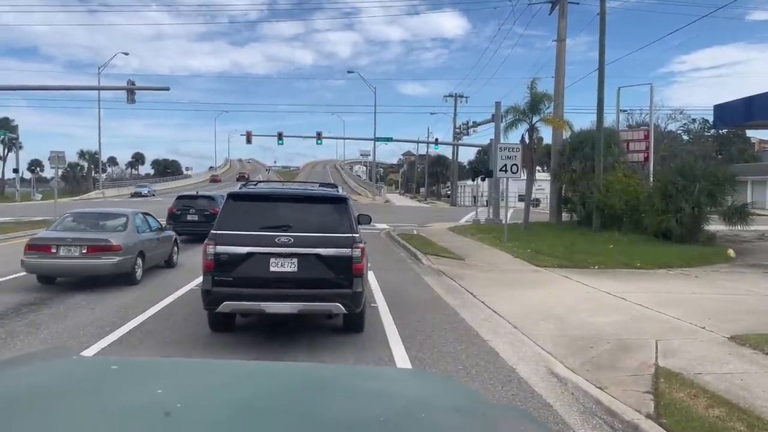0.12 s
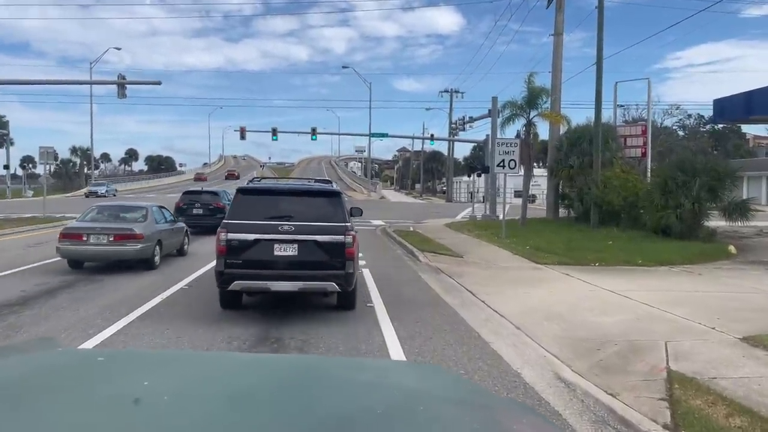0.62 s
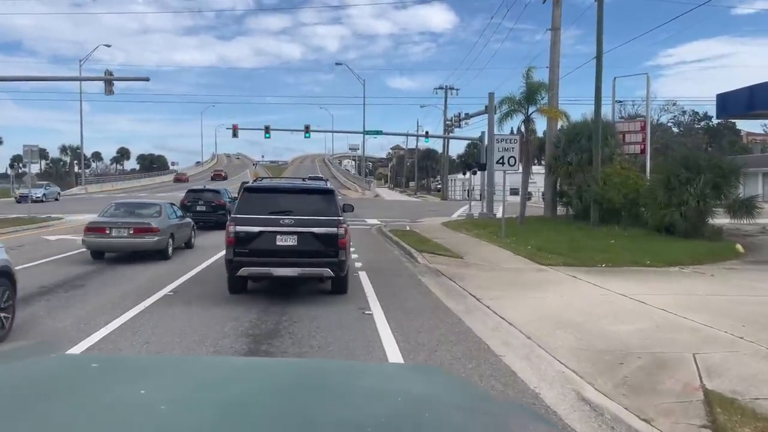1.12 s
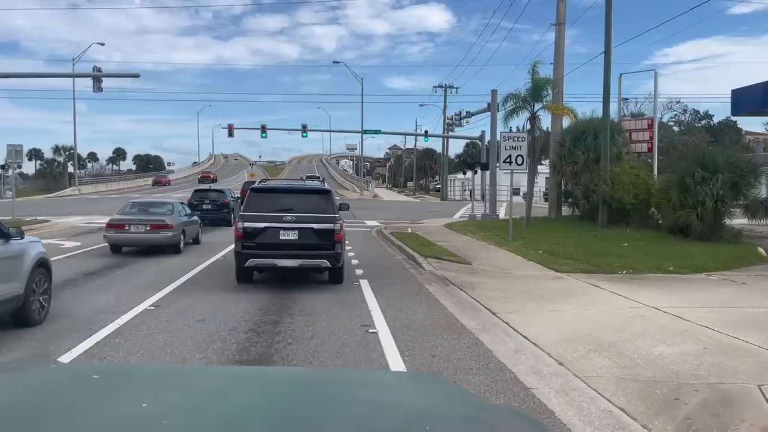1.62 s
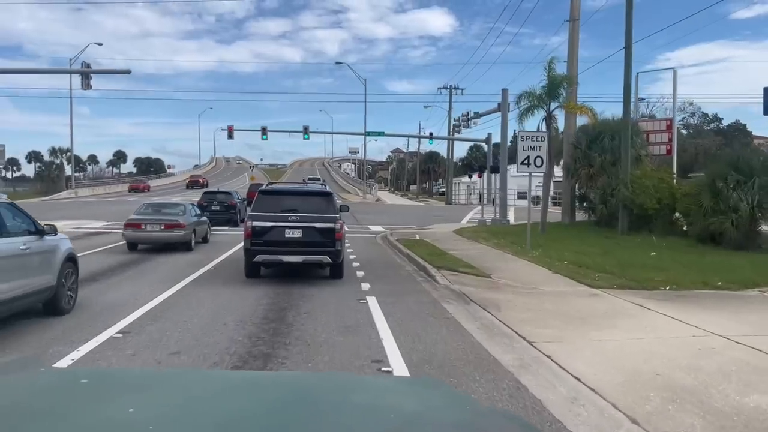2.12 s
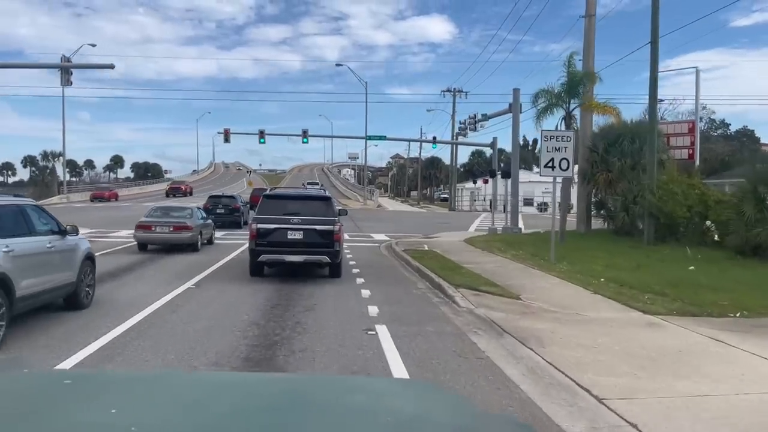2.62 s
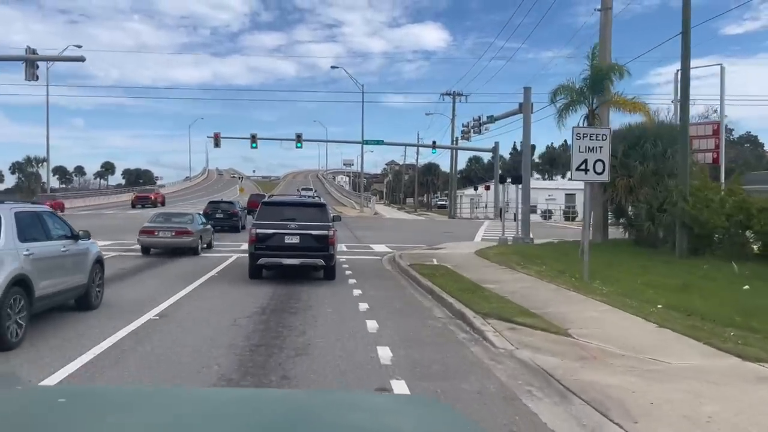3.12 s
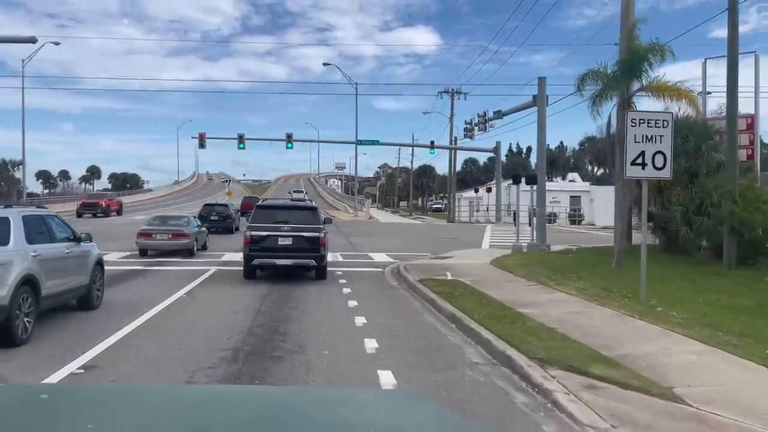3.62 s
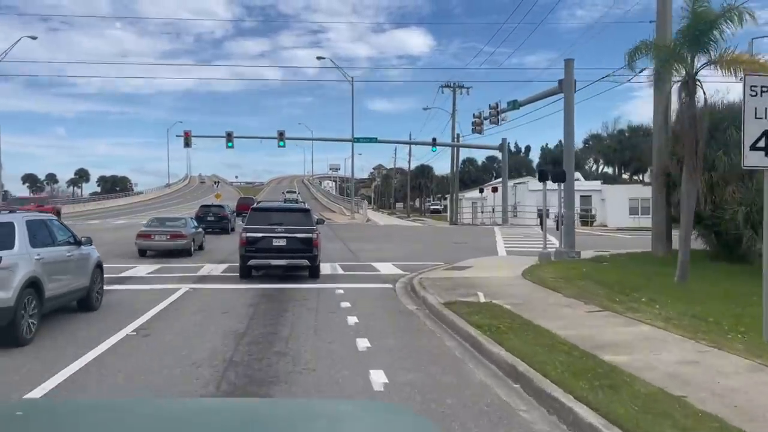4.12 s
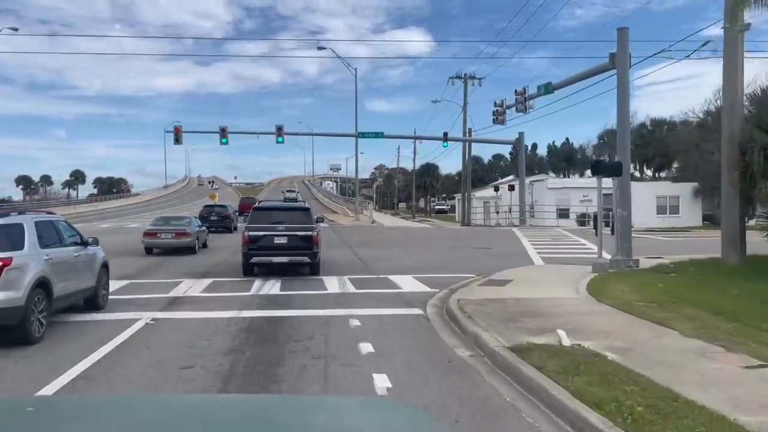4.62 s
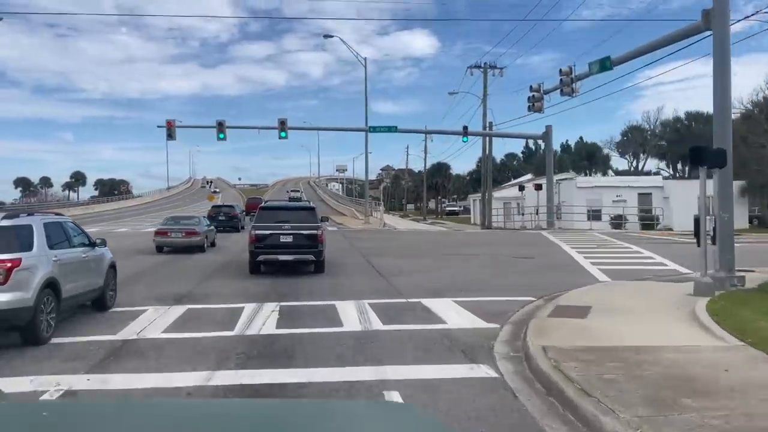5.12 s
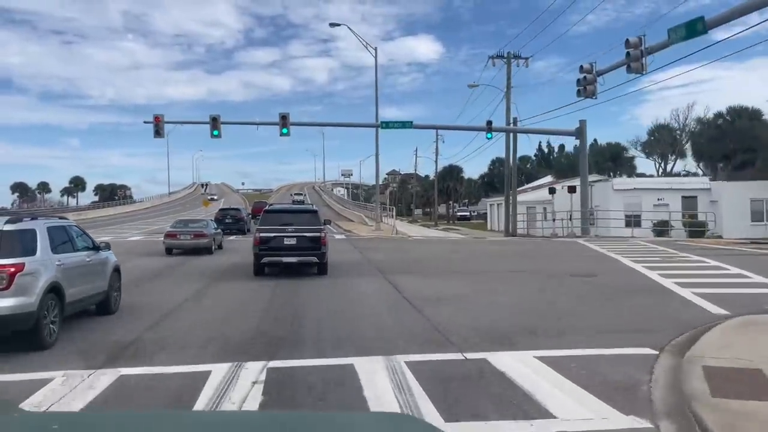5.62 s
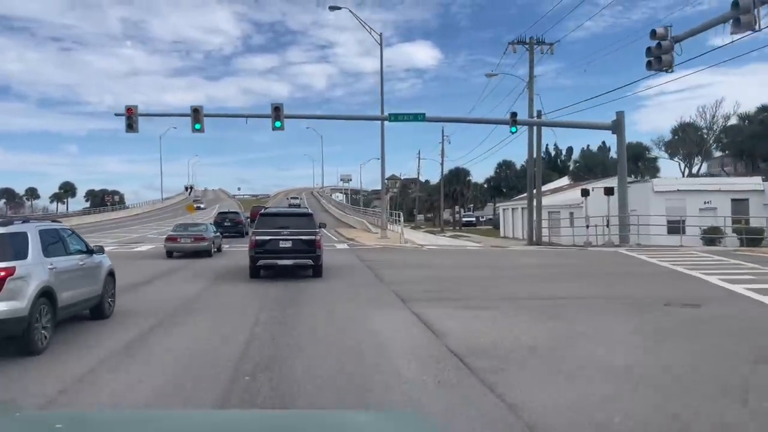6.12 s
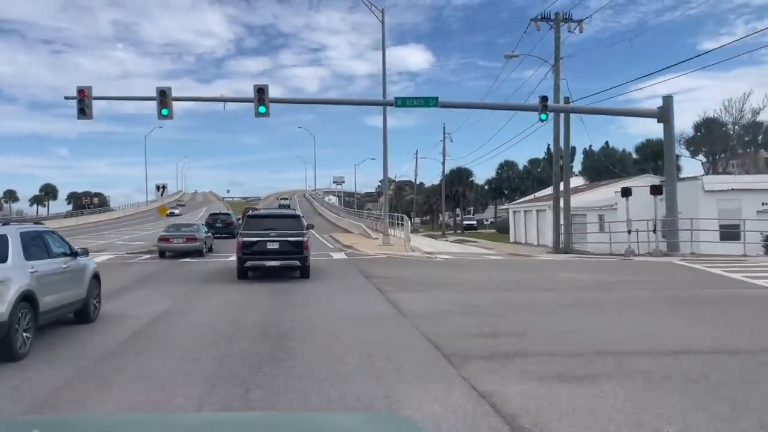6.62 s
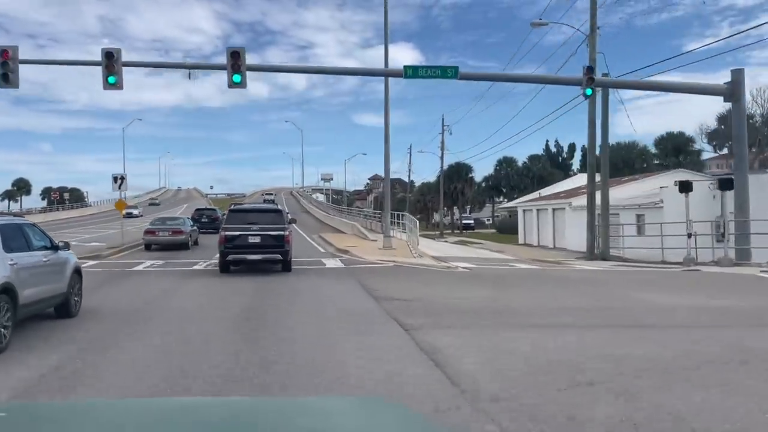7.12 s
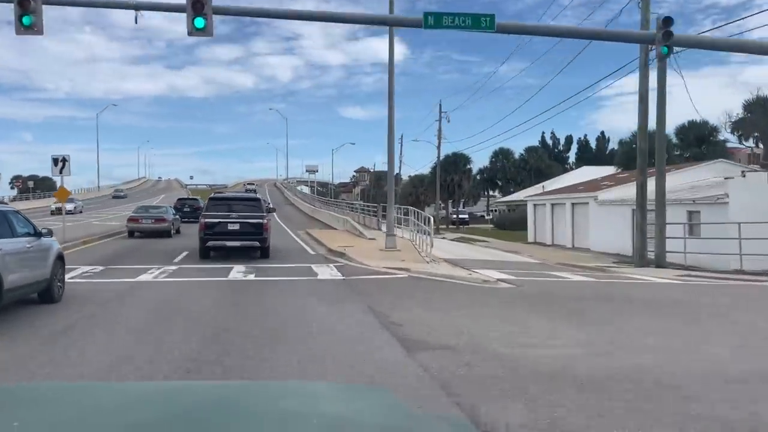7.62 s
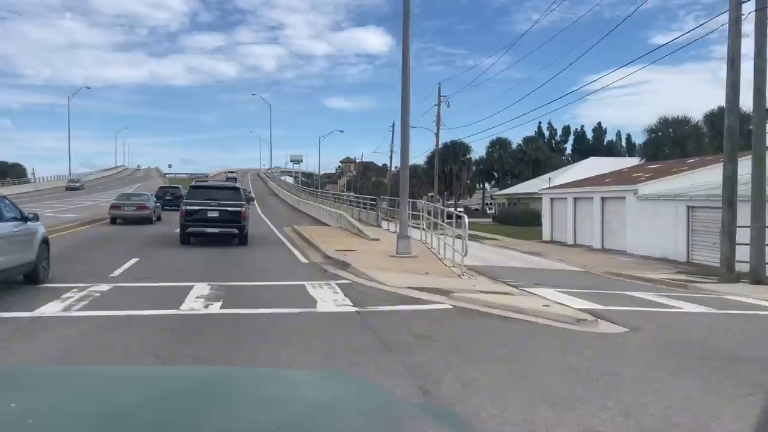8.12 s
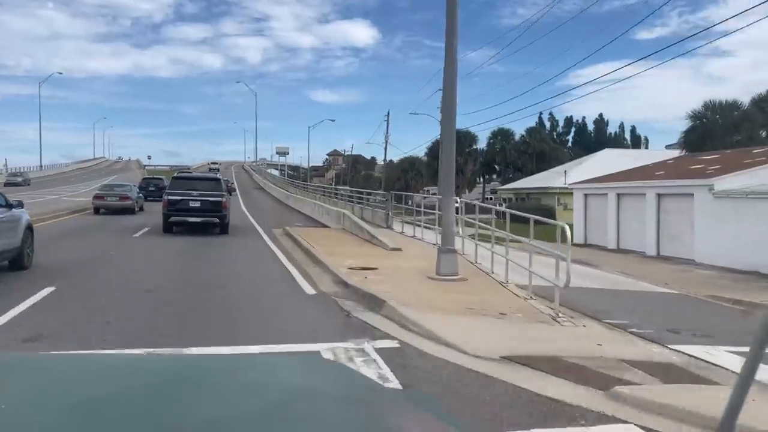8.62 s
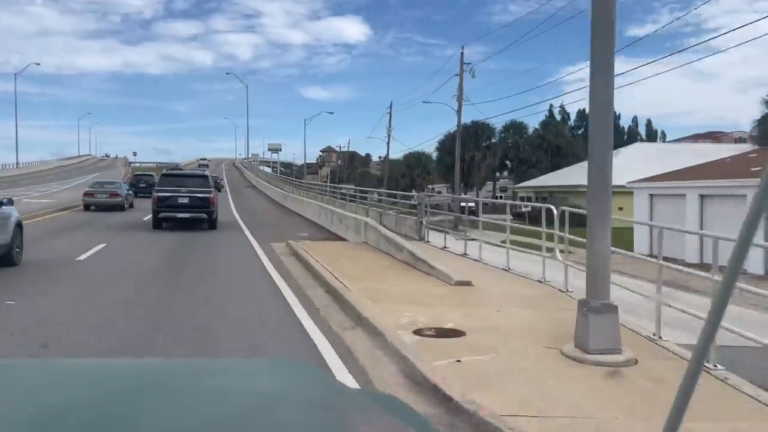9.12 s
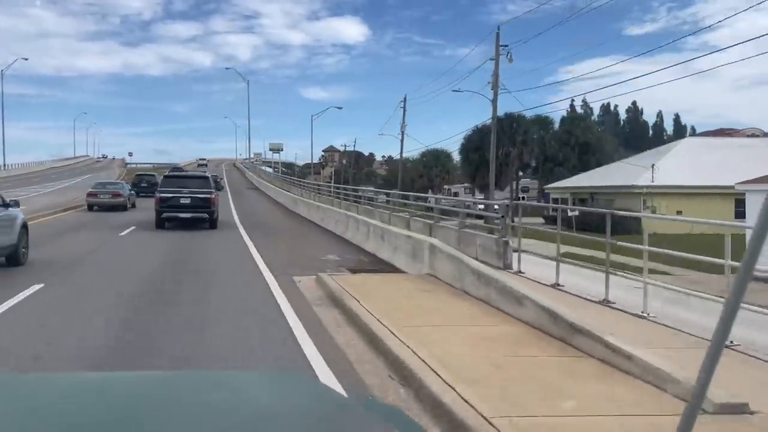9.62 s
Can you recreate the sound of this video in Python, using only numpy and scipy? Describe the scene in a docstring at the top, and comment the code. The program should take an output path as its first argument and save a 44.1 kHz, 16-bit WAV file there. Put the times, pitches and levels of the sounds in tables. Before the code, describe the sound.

Inside an old truck's small, boxy cab, the microphone hears a six-cylinder turbo diesel, dense and bass-heavy with slightly squeezed peaks. From 0 to 2 seconds it lugs near idle, uneven and knocking, with heavy thumps around 0.2 to 1.2 and dry trim ticks; the revs dip slightly near 2. From 2.2 it pulls hard, pitch climbing continuously to about triple by 6.5, the separate knocks merging into a booming drone with metallic clatter, dash rattles around 3 to 4.3, a faint rising turbo whistle and fuzzy gear whine. At 6.7 load comes off and the pitch falls quickly to a low at 7.4. A short blip peaks near 7.75 with panel shudder and rattling, then the engine settles by 8 and pulls again, rising gently until 9.8. Road rumble and soft, fluttering air hiss continue underneath.

```python
"""Inside an old truck cab, a six-cylinder turbo diesel creeps off near idle, pulls up through a gear,
drops off load for a gear change with a throttle blip, and pulls again. Sines locked to the firing rate
make the exhaust boom; uneven impulse trains ring the frame, panels, cab air and firewall. Shaped noise
makes clatter, rasp, rumble and hiss, wavering sines the turbo and gears, short bursts the thumps and taps."""
import sys
import numpy as np
from scipy import signal
from scipy.fft import rfft, irfft, next_fast_len
from scipy.io import wavfile
from scipy.ndimage import uniform_filter1d, map_coordinates

SR = 44100
rng = np.random.default_rng(int(sys.argv[2]) if len(sys.argv) > 2 else 0)


def generate_wav(signal):
    """Clip the signal to [-1, 1] and save it as 16-bit WAV at the path in sys.argv[1]."""
    frames = np.transpose(np.atleast_2d(signal))
    scaled = np.clip(frames, -1, 1) * 32767
    pcm = np.round(scaled).astype(np.int16)
    wavfile.write(sys.argv[1], SR, pcm)


def amplitude_ratio(level_db):
    """Convert a level in decibels to the matching linear amplitude (field) ratio."""
    exponent = np.asarray(level_db, float) / 20
    return 10 ** exponent


N = 430416

# the six cylinders in firing order: frame shake, knock at low revs, its lag/ms,
# knock at high revs, its lag/ms
CYLINDER_BLOWS = [(1.35, .4, -.47, .3, -.57), (-.9, .75, 1.01, .2, .79), (-.2, .3, .7, .65, 1.3),
                  (.45, .7, -.1, .4, -.54), (0, .45, 1.11, .25, .75), (-.9, 1, 0, 1, 0)]
# floor and door panels, passed twice: f/Hz, width/Hz, relative level per pass/dB
FRAME_MODES = [(54.6, 11.4, 2.5), (106.2, 11.6, -1.5), (116.4, 9.4, -0.5), (173, 23.5, -3.5),
               (183, 11.4, 1), (224.3, 75.5, -6.5)]
# firewall and dash, passed twice: f/Hz, width/Hz, relative level per pass/dB
FIREWALL_MODES = [(500, 72, 3.5), (602.7, 33.4, 3), (649, 30.3, 4), (742.4, 42, 2.5), (813.6, 42, 2),
                  (1190, 120, -5.5)]
KNOCK_AFTER = 0.5  # aim of a knock in the cab air, as a share of the gap between firings


def unit(x):
    """Normalisation: scale to rms 1."""
    return x / np.sqrt(np.mean(x ** 2) + 1e-20)


def curves(rows):
    """Linear interpolation: one value per sample for each column after the time."""
    s, *cols = np.transpose(rows)
    return [np.interp(np.arange(N) / SR, s, c) for c in cols]


def wobble(rate):
    """Slow random modulation: a spline through random knots, rate knots a second."""
    knots = rng.standard_normal(int(N * rate / SR) + 4)
    return map_coordinates(knots, [np.arange(N) * rate / SR])


def filtered(x, response):
    """Linear filtering: the spectrum of x times a complex response of frequency."""
    m = next_fast_len(N + SR // 2)
    return irfft(rfft(x, m) * response(np.fft.rfftfreq(m, 1 / SR)), m)[:N]


def modes(table):
    """Modal superposition: causal resonances (f/Hz, width/Hz, level/dB) of alternating sign."""
    return lambda f: sum((-1) ** k * amplitude_ratio(db) * 1j * f * w / (c * c - f * f + 1j * f * w)
                         for k, (c, w, db) in enumerate(table))


def band(lo_hz, hi_hz):
    """Band-pass filtering: causal edges of 12 dB an octave."""
    return lambda f: (1j * f / (lo_hz + 1j * f)) ** 2 / (1 + 1j * f / hi_hz) ** 2


def spectrum(points):
    """Spectral shaping: gain from (f/Hz, level/dB) points on a log axis."""
    f, db = np.transpose(points)
    return lambda hz: amplitude_ratio(np.interp(np.log(hz + 1), np.log(f), db, -120, -120))


def by_pitch(points, hz):
    """Frequency dependence: read (f/Hz, level/dB) points on a log axis."""
    f, db = np.transpose(points)
    return np.interp(np.log(hz), np.log(f), db)


def rush(colour, patchy_db):
    """Coloured noise of rms 1, its short-time spectrum given patches of random gain."""
    z = signal.stft(rng.standard_normal(N + 1024), nperseg=1024)[2]
    field = uniform_filter1d(rng.standard_normal(z.shape), 4, 0)
    field = uniform_filter1d(field, 9, 1)
    noise = signal.istft(z * amplitude_ratio(patchy_db * unit(field)), nperseg=1024)[1][:N]
    return unit(filtered(noise, colour))


def pings(rows, rise_s):
    """Transient ringing: short swelling tones of drifting pitch, each (t/s, peak level/dB, f/Hz)."""
    out, t = np.zeros(N + SR), np.arange(SR // 8) / SR
    swell = (t / rise_s * np.exp(1 - t / rise_s)) ** 2
    for (s, db, hz), (phase, drift) in zip(rows, rng.standard_normal((len(rows), 2))):
        tone = np.sin(2 * np.pi * hz * t * (1 + 0.18 * drift * t) + 3 * phase)
        out[round(s * SR):][:len(t)] += amplitude_ratio(db) * swell * tone
    return out[:N]


def cab(f):
    """Modal dispersion: the cab air's low modes answer first, so a knock is a puff that glides up."""
    # cab air, passed twice: f/Hz, width/Hz, relative level per pass/dB
    air_modes = [(295.7, 38.5, 1), (351.5, 30.3, 4.5), (384, 30, 3), (424.3, 19.7, 0.5)]
    spread_s_per_hz, centre_hz = 0.00011, 360.3  # growth of delay with frequency about the centre
    phase = -np.pi * spread_s_per_hz * (f - centre_hz) ** 2
    return np.abs(modes(air_modes)(f)) ** 2 * np.exp(1j * phase)


def exhaust(rate, slack):
    """Pipe resonance: the firing tone and two harmonics swell as they sweep through the resonances."""
    # firing tone at full load: f/Hz, rms level/dB
    pipe_first = [(36, -27), (41, -24), (45, -6), (51, -5), (62, -4.5), (72, -5), (80, -8), (86, -10.5),
                  (94, -11), (100, -7), (103, -10), (112, -5.5), (120, -4.5)]
    # its second harmonic at full load: f/Hz, rms level/dB
    pipe_second = [(74, -9), (82, -13), (90, -30), (107, -14.5), (124, -30), (144, -29.5), (158, -21),
                   (170, -7.5), (187, -20), (199, -12), (205, 1.5), (214, -9), (227, -10.5), (240, -17.5)]
    # its third harmonic at full load: f/Hz, rms level/dB
    pipe_third = [(130, -39), (160, -46), (185, -28), (212, -23.5), (230, -22), (270, -23), (300, -43),
                  (360, -28)]
    tone_off_db, upper_off_db = -15, -26.5  # change from full load to none
    angle = 2 * np.pi * np.cumsum(rate) / SR
    tone_db = by_pitch(pipe_first, rate) + tone_off_db * slack + 0.67 * wobble(15)
    octave_db = by_pitch(pipe_second, 2 * rate) + upper_off_db * slack + 0.8 * wobble(30)
    third_db = by_pitch(pipe_third, 3 * rate) + upper_off_db * slack + 2.0 * wobble(5)
    tone = amplitude_ratio(tone_db) * np.sin(angle + 0.32)
    octave = amplitude_ratio(octave_db) * np.sin(2 * angle + 3.0)
    third = amplitude_ratio(third_db) * np.sin(3 * angle)
    return np.sqrt(2) * (tone + octave + third)


def frame_lope(rate, slack, train, shake, chance):
    """Subharmonic excitation: only unevenness between cylinders rocks the frame, between firing orders."""
    # rocking at full load: firing rate/(1/s), level/dB
    lope_levels = [(40, -10), (50, -12.5), (58, -16.5), (68, -19.5), (80, -19), (88, -14), (98, -12),
                   (106, -15), (115, -19.5), (121, -16)]
    off_db = -2  # change from full load to none
    uneven = shake - shake.mean() + 0.12 * chance
    lope = unit(filtered(train(uneven), lambda f: modes(FRAME_MODES)(f) ** 2 * band(25, 300)(f)))
    # the deepest rocking dies away in part between 54 and 99 firings a second
    calm = 0.59 * np.clip((rate - 54) / (99 - 54), 0, 1)
    lope = lope - calm * filtered(lope, lambda f: 1 / (1 + (f / 72) ** 8))
    return amplitude_ratio(by_pitch(lope_levels, rate) + off_db * slack) * lope


def panel_ring(train, high):
    """Narrow-band resonance: panels ring once a cycle, chiefly to the strongest cylinder."""
    # narrow panels, passed twice: f/Hz, width/Hz
    narrow_panels = [(184, 6.3), (299, 6.6), (328, 15), (350, 12.8)]
    # ring of each panel in turn: t/s, then four rms levels/dB
    ring_levels = [(0, -18, -51, -46, -35), (.6, -14.5, -48, -26, -38), (1, -26.5, -18.5, -27, -24),
                   (1.6, -26.5, -28.5, -19.5, -53), (2.2, -24.5, -34, -27, -57),
                   (2.75, -20.5, -20, -14.5, -28), (3.15, -26, -49, -29, -16), (3.45, -48, -46, -42, -20.5),
                   (3.75, -60, -37, -37, -21.5), (4.08, -42, -43, -52, -11.5), (4.4, -40, -45, -68, -27),
                   (6.9, -53, -45, -47, -43), (7.2, -22, -34, -32, -29), (7.38, -33, -40, -33, -22.5),
                   (7.55, -23, -27, -35, -19), (7.75, -12.5, -29, -38, -28), (7.95, -46, -31, -72, -52),
                   (9.76, -30, -50, -71, -71)]
    blows = train(high ** 3)  # cubing favours the strongest
    ring = np.zeros(N)
    for (hz, width_hz), db in zip(narrow_panels, curves(ring_levels)):
        panel = modes([(hz, width_hz, 0)])
        ring = ring + amplitude_ratio(db) * unit(filtered(blows, lambda f: panel(f) ** 2))
    return ring


def cab_growl(rate, slack, train, at, dull, low_ms, sharp, high_ms):
    """Cavity excitation: knocks drive the cab air over a bed of road rumble."""
    # growl at full load: firing rate/(1/s), level/dB
    growl_levels = [(40, -15.5), (52, -16.5), (70, -19.5), (81, -17.5), (92, -17.5), (101, -15.5),
                    (108, -18.5), (120, -17.5)]
    # road rumble: f/Hz, relative density/dB per Hz
    road_colour = [(18, -17), (30, -30), (60, -28), (120, -28), (190, -38), (260, 1), (350, -39), (430, -6),
                   (600, -58)]
    off_db = -7.5  # change from full load to none
    take_up_db, take_up_s = -13, 1.25  # held back at the start, swelling until the clutch has bitten
    growl_db = by_pitch(growl_levels, rate) + off_db * slack
    growl_db = growl_db + take_up_db * np.clip(1 - np.arange(N) / SR / take_up_s, 0, 1)
    # makes up the 9 ms lead of the blows and moves the knock from 0.3 of the gap to KNOCK_AFTER
    wait_ms = 9 + 1000 * (KNOCK_AFTER - 0.3) / rate[at]
    # slow combustion gives a duller blow
    soft = filtered(train(dull, low_ms + wait_ms), lambda f: 1 / (1 + (f / 300) ** 2) ** 4)
    knocks = amplitude_ratio(26) * soft + train(sharp, high_ms + wait_ms)
    rumble = amplitude_ratio(-16) * rush(spectrum(road_colour), patchy_db=1.5)
    return amplitude_ratio(growl_db) * (unit(filtered(knocks, cab)) + rumble)


def firewall_throat(slack, train, dull, low_ms, sharp, high_ms, chance):
    """Structure-borne transmission: regular and stray blows, with noise, ring the firewall."""
    throat_db, off_db = -29, -9.5  # at full load; change from full load to none
    wall = lambda f: modes(FIREWALL_MODES)(f) ** 2
    stray = train(0.4 * chance[:, 2], 4 + 2 * np.abs(chance[:, 3]))
    blows = train(dull, low_ms) + train(sharp, high_ms) + stray
    throat = unit(filtered(blows, wall)) + amplitude_ratio(-2) * rush(wall, patchy_db=3)
    return amplitude_ratio(throat_db + off_db * slack) * throat


def block_clatter(rate, slack, train, knock, chance):
    """Amplitude modulation: firings swell noise in the resonances of the engine block."""
    # engine block and covers: f/Hz, width/Hz, relative level/dB
    block_modes = [(908, 180, 4), (1178, 170, 3), (1406, 47, 3.5), (1572, 167, -0.5), (1950, 420, -4.5),
                   (2220, 26, 3), (2365, 110, -3.5), (2770, 50, -3.5), (2910, 93, -6.5), (3700, 300, -7.5),
                   (3746, 136, -6), (4760, 2240, -12.5)]
    # clatter at full load: firing rate/(1/s), level/dB
    clatter_levels = [(40, -30), (55, -32.5), (70, -33), (82, -32.5), (100, -31), (120, -31)]
    off_db = -8.5  # change from full load to none
    bursts = train((0.6 + knock) * amplitude_ratio(1.5 * chance))
    gate = 5 + unit(filtered(bursts, lambda f: 1 / (1 + 1j * f / 55) ** 2))
    flutter = amplitude_ratio(0.9 * wobble(9))
    noise = rush(lambda f: np.abs(modes(block_modes)(f) * band(800, 6000)(f)), patchy_db=2.0)
    return amplitude_ratio(by_pitch(clatter_levels, rate) + off_db * slack) * unit(gate * flutter * noise)


def engine(rate, slack):
    """Periodic impulse excitation: each firing drives frame, panels, cab air, firewall and block."""
    # share added to the knock of the cylinder opposite the strongest: t/s, share
    twin_share = [(3, 0), (5.4, 0), (5.85, .45), (6.2, 0), (7.9, .1), (8.1, .3), (9.76, .3)]
    # spells of harder rattling in dash and covers: t/s, level change/dB
    rattle_spells = [(.5, -2), (1.6, 0), (2.5, 0.5), (2.9, 0), (3.08, 1.5), (3.25, 2), (3.45, -0.5),
                     (5.5, -0.5), (7.45, -0.5), (7.7, 4.5), (8.0, 0.5), (8.45, 1)]
    fired = np.cumsum(rate) / SR
    count = np.arange(int(fired[-1]) - 1)
    cylinder = count % len(CYLINDER_BLOWS)
    # blows start 9 ms ahead of 0.3 of the gap
    at = np.maximum(np.searchsorted(fired, count + 0.3) - round(0.009 * SR), 50)
    shake, low, low_ms, high, high_ms = np.array(CYLINDER_BLOWS)[cylinder].T
    high = high + curves(twin_share)[0][at] * (cylinder == 2)
    chance = rng.standard_normal((len(at), 4))

    def train(size, ms=0):
        """Path delay: each cylinder's blow arrives a little early or late."""
        arrival = at + np.round(ms * SR / 1000).astype(int)
        return np.bincount(arrival, size / np.sqrt(rate[at]), N)[:N]

    revs = np.clip((rate[at] - 42) / 12, 0, 1)  # from low-rev to high-rev knock
    dull = (1 - revs) * (low + 0.17 * chance[:, 1])
    sharp = revs * (high + 0.1 * chance[:, 1])
    body = frame_lope(rate, slack, train, shake, chance[:, 0]) + panel_ring(train, high)
    growl = cab_growl(rate, slack, train, at, dull, low_ms, sharp, high_ms)
    throat = firewall_throat(slack, train, dull, low_ms, sharp, high_ms, chance)
    clatter = block_clatter(rate, slack, train, low + revs * (high - low), chance[:, 3])
    return body + growl + amplitude_ratio(curves(rattle_spells)[0]) * (throat + clatter)


def heave(rate):
    """Low-frequency body motion: tyre and spring rumble and a frame hum, strongest near idle."""
    # slow heave of tyres and springs: f/Hz, relative density/dB per Hz
    heave_colour = [(18, -21), (30, 6), (40, 7), (52, -4), (70, -28)]
    hum_order, hum_from, hum_to = 4 / 3, 34, 68  # order of the firing rate; fade limits, firings/s
    hum = np.sin(2 * np.pi * hum_order * np.cumsum(rate) / SR)
    hum = hum * np.clip((hum_to - rate) / (hum_to - hum_from), 0, 1)
    deep_db = -31 + 8 * np.clip((52 - rate) / 8, 0, 1) + 2.5 * wobble(6)
    deep = amplitude_ratio(deep_db) * rush(spectrum(heave_colour), patchy_db=2.5)
    return deep + amplitude_ratio(-18 + 2.5 * wobble(5)) * hum


def hiss():
    """Turbulent noise: air leaking round the doors, with road hiss, flutters irregularly."""
    # air and road hiss: f/Hz, relative density/dB per Hz
    air_colour = [(2500, 12.5), (4000, 5.5), (5500, 8), (7400, 2.5), (8600, 0.5), (9600, -1), (10800, -0.5),
                  (12200, -8), (13900, -17), (14600, -41)]
    # treble hiss: t/s, level/dB
    hiss_levels = [(0.0, -52.5), (1.74, -44), (3.62, -41), (5.14, -37.5), (5.57, -42), (6.3, -39),
                   (7.23, -45.5), (8.7, -38.5), (9.76, -40.5)]
    hiss_db = curves(hiss_levels)[0] + 0.48 * wobble(8.0)
    return amplitude_ratio(hiss_db) * rush(spectrum(air_colour), patchy_db=3.0)


def valve_gear():
    """Modulated resonant noise: valve gear rasps through the covers in quick uneven grains."""
    # covers: f/Hz, width/Hz, relative level/dB
    cover_modes = [(1750, 260, -7.5), (2060, 240, 1.5), (2800, 200, -5), (3220, 500, -8.5),
                   (4170, 140, -13)]
    # rasp: t/s, level/dB
    rasp_levels = [(0, -53), (1, -42), (1.9, -36.5), (2.7, -38), (3.3, -54), (5, -41.5), (6.6, -50),
                   (7.3, -53), (8.2, -37.5), (8.7, -39.5), (9.76, -41)]
    grain_db = 2.5 * wobble(70) + 1.2 * wobble(11)
    noise = rush(lambda f: np.abs(modes(cover_modes)(f) * band(1200, 6000)(f)), patchy_db=2.0)
    return amplitude_ratio(curves(rasp_levels)[0]) * unit(amplitude_ratio(grain_db) * noise)


def thumps():
    """Impulsive excitation: heavy firings ring the cab; the gear change shudders the upper panels."""
    # single heavy firings: t/s, peak level/dB, f/Hz
    heavy_firings = [(.125, -20, 368), (.235, -10.5, 314), (.27, -12, 357), (.405, -19.5, 378),
                     (.52, -13, 322), (0.55, -12.5, 363), (.685, -14, 299), (.83, -6, 305),
                     (.975, -3.5, 314), (1.18, -6, 307), (4.684, -6, 353), (6.331, -9, 346),
                     (7.968, -9.5, 370), (8.324, -12, 357)]
    # driveline shudder as the gears part and meet: t/s, level/dB
    shudder_levels = [(6.7, -26), (6.9, -22), (7.35, -22), (7.5, -15.5), (7.62, -16), (7.75, -15),
                      (7.9, -16), (8.05, -25)]
    upper_panels = lambda f: np.abs(modes(FRAME_MODES)(f) ** 2 * band(110, 400)(f))
    shudder = amplitude_ratio(curves(shudder_levels)[0]) * rush(upper_panels, patchy_db=2.5)
    return pings(heavy_firings, rise_s=0.013) + shudder


def jolts():
    """Shock response: the dash jolts on its mounts, one part rings and the whole firewall rattles."""
    # jolts of the dash: t/s, peak level of the ring/dB, f/Hz
    dash_jolts = [(0.24, -20, 504), (0.275, -16, 500), (1.14, -16, 530), (1.569, -19.5, 643),
                  (1.64, -17, 687), (2.992, -25, 1205), (3.03, -14, 722), (3.098, -23, 1198),
                  (3.115, -22, 810), (3.175, -22, 763), (3.21, -24, 810), (3.26, -29, 790),
                  (3.585, -33, 740), (3.96, -28, 1160), (4.11, -31, 1200), (4.165, -23, 765),
                  (4.18, -30, 1190), (4.28, -21, 742), (6.337, -19, 593), (6.389, -17, 610),
                  (6.438, -23, 604), (7.455, -24, 780), (7.51, -28, 715), (7.72, -24.5, 932),
                  (7.76, -28, 500), (7.85, -18, 513), (7.88, -18, 505), (7.91, -23, 714), (7.995, -29, 740),
                  (8.04, -29, 736)]
    rattle_db = 15.5  # noise drive ahead of the firewall, over the ring
    blows, t = np.zeros(N + SR), np.arange(SR // 20) / SR
    envelope = t / 0.012 * np.exp(1 - t / 0.0048)
    for s, db, _ in dash_jolts:
        blows[round(s * SR):][:len(t)] += amplitude_ratio(db + rattle_db) * envelope * rng.standard_normal(len(t))
    rattle = filtered(blows[:N], lambda f: modes(FIREWALL_MODES)(f) ** 2)
    return pings(dash_jolts, rise_s=0.0095) + rattle


def taps():
    """Contact noise: loose trim ticks drily with a dull part, a bright part and a brief ring."""
    # taps: t/s, relative burst level/dB, bright part over the burst/dB, ring f/Hz, ring peak level/dB
    trim_taps = [(0.748, -16, -32, 1480, -23), (1.17, -17, -39, 2100, -32), (1.411, -15, -44, 1530, -22),
                 (1.562, -16, -46, 2050, -30), (1.644, -11.5, -44, 3550, -23), (1.715, -19, -48, 2200, -29),
                 (2.996, -15, -34, 2400, -40), (3.714, -22, -40, 1890, -34), (3.747, -16, -40, 2300, -44),
                 (3.8098, -19, 0.5, 2310, -35), (4.004, -15, -40, 2400, -38), (4.29, -19, -40, 2250, -29),
                 (7.965, -14, -35, 2300, -28), (8.908, -19, -47, 2060, -21)]
    dull, bright, t = np.zeros(N + SR), np.zeros(N + SR), np.arange(SR // 20) / SR
    swell = (t / 0.006 * np.exp(1 - t / 0.006)) ** 2
    for s, db, bright_db, *_ in trim_taps:
        tick = amplitude_ratio(db) * swell * rng.standard_normal((2, len(t)))
        dull[round(s * SR):][:len(t)] += tick[0]
        bright[round(s * SR):][:len(t)] += amplitude_ratio(bright_db) * tick[1]
    body = filtered(dull[:N], lambda f: band(1500, 3160)(f) / (1 + 1j * f / 9000) ** 3)
    sheen = filtered(bright[:N], lambda f: band(7500, 7500)(f) ** 4)
    ring = pings(np.array(trim_taps)[:, [0, 4, 3]], rise_s=0.0025)
    return amplitude_ratio(3.0) * body + amplitude_ratio(45.0) * sheen + ring


def singing(rate, slack):
    """Order resonance: once the revs are up, upper orders swell as they glide through the cab modes."""
    # multiples of the six-firing cycle
    sung_orders = [18, 20, 24, 27, 29, 30, 32, 36]
    # drive of each order ahead of the cab modes: level/dB
    sung_levels = [-24, -23, -29, -27.5, -22.5, -24, -22.5, -25.5]
    count = len(CYLINDER_BLOWS)
    angle = 2 * np.pi * (np.cumsum(rate) / SR + 1 - KNOCK_AFTER) / count  # in step at the strongest knock
    lines = np.zeros(N)
    for order, db in zip(sung_orders, sung_levels):
        line = np.real(cab(order * rate / count) * np.exp(1j * order * angle))
        lines = lines + amplitude_ratio(db + 3.9 * wobble(3.6)) * line
    return amplitude_ratio(-22 * slack) * np.clip((rate - 50) / 14, 0, 1) * lines


def whistles():
    """Frequency modulation: jitter breaks up the turbo blade tone and smears the gear whine."""
    # turbo blade tone: t/s, f/Hz, relative level/dB
    blade_track = [(2.9, 4200, -70), (3.24, 4774, -55), (3.31, 4930, -42), (3.75, 5890, -37),
                   (4.0, 6390, -40), (4.3, 6920, -36.5), (4.6, 7277, -38.5), (5.1, 7585, -45.5),
                   (5.7, 8240, -32), (6.2, 9114, -44.5), (6.45, 9350, -44), (6.62, 9330, -40),
                   (6.8, 8490, -43), (7.2, 6992, -43), (7.6, 5973, -44), (7.85, 5770, -41),
                   (8.05, 5880, -41), (8.35, 6400, -42), (8.65, 7000, -38), (8.9, 7400, -42),
                   (9.2, 7640, -43), (9.74, 7808, -51)]
    # gear whine: t/s, f/Hz, relative level/dB
    gear_track = [(4.1, 5120, -70), (4.5, 5200, -52), (5.2, 5350, -53), (5.6, 5550, -47), (6, 5850, -42),
                  (6.5, 5800, -47), (6.75, 5900, -80)]
    # faint thin whine far up: t/s, f/Hz
    thin_track = [(3.9, 12900), (4.7, 13200), (5.8, 13400), (6.9, 13300), (7.8, 12800), (8.3, 13000),
                  (9.4, 13350)]
    blade_hz, blade_db = curves(blade_track)
    mesh_hz, mesh_db = curves(gear_track)
    thin_hz = curves(thin_track)[0]

    def jittered(hz, depth, knots):
        return np.sin(2 * np.pi * np.cumsum(hz * (1 + depth * wobble(knots))) / SR)

    # a firm core and a fuzzy skirt
    blade = 0.8 * jittered(blade_hz, 0.0022, 150) + 0.4 * jittered(blade_hz, 0.012, 300)
    mesh = jittered(mesh_hz, 0.016, 250)
    thin = jittered(thin_hz, 0.003, 100)
    flicker_db = 1.2 * wobble(7) + 3.5 * wobble(30)
    turbo = amplitude_ratio(blade_db + flicker_db) * blade
    faint = amplitude_ratio(blade_db - 33 + 5 * wobble(5)) * thin
    return turbo + faint + amplitude_ratio(mesh_db + 3.3 * wobble(32)) * mesh


def scene():
    """Superposition: all sources add in the small cab; slack is the unused share of the load."""
    # engine speed: t/s, firing rate/(1/s)
    firing_rates = [(0.0, 40.8), (0.25, 43.2), (0.65, 41.0), (1.65, 40.0), (2.0, 36.8), (2.2, 41.8),
                    (2.6, 50.0), (3.0, 57.5), (4.0, 79.7), (4.4, 87.6), (5.0, 97.7), (6.0, 113.6),
                    (6.52, 120.6), (6.62, 120.2), (6.8, 111.0), (7.05, 99), (7.42, 54.4), (7.52, 66),
                    (7.6, 75.4), (7.72, 80.8), (7.82, 80.4), (8.02, 66.5), (8.2, 69.0), (8.5, 71.1),
                    (9.2, 75.7), (9.76, 78.8)]
    # fuel burnt: t/s, load as a share of 1
    fuel_load = [(0, 0.68), (.3, 0.83), (1.0, 0.76), (1.8, 0.86), (2.4, 0.81), (2.7, 0.96), (4.2, 0.79),
                 (5.5, 0.72), (6.0, 0.91), (6.72, 0.6), (6.8, 0.2), (7.4, 0.1), (7.58, 0.29), (7.88, 0.63),
                 (7.97, 0.91), (9.76, 0.85)]
    rate = curves(firing_rates)[0]
    slack = 1 - np.clip(curves(fuel_load)[0], 0, 1)
    motor = exhaust(rate, slack) + engine(rate, slack) + valve_gear() + thumps()
    motor = motor + singing(rate, slack) + whistles()
    return (motor + heave(rate) + hiss() + jolts() + taps())[None]


def top_cut(x):
    """Nothing passes above the cut-off."""
    return signal.sosfilt(signal.butter(12, 14200, fs=SR, output="sos"), x)


def record(dry):
    """Saturation between two filters: deep bass is lost, peaks are squeezed, a treble band nearly vanishes."""
    bass_cut = filtered(dry[0], band(20, 1e6))
    squeezed = bass_cut / (1 + np.abs(bass_cut / 0.96) ** 10) ** (1 / 10)
    notch = lambda f: 1 - 0.965 / (1 + ((f - 8200) / 450) ** 4)
    mix = filtered(squeezed, notch)[None]
    return top_cut(mix)


dry = scene()
out = record(dry)
generate_wav(out)
```